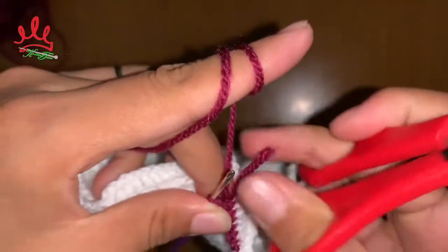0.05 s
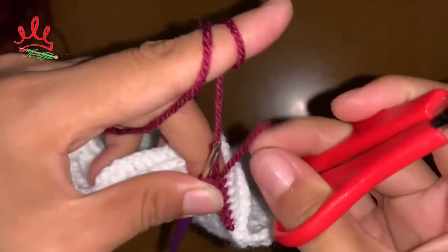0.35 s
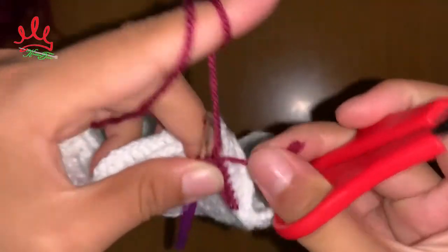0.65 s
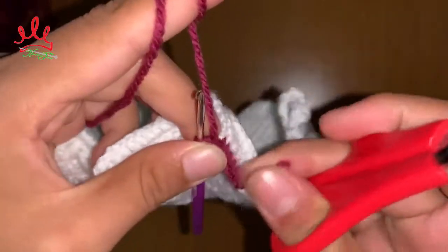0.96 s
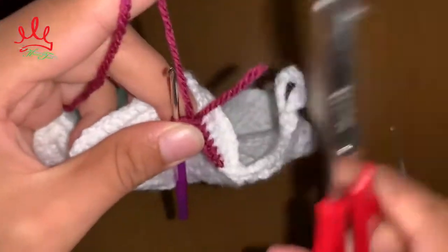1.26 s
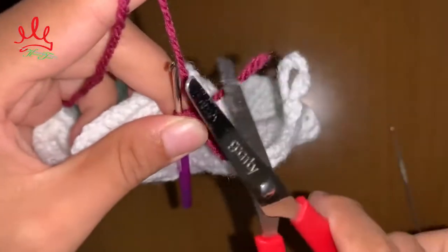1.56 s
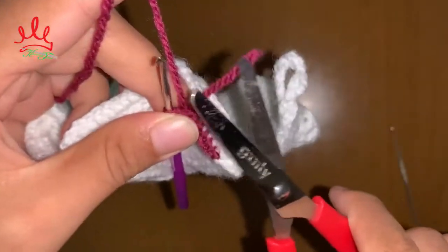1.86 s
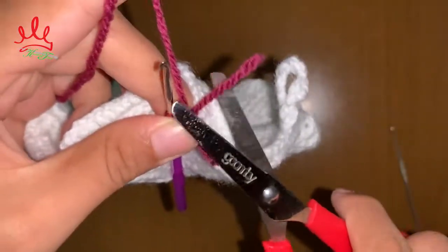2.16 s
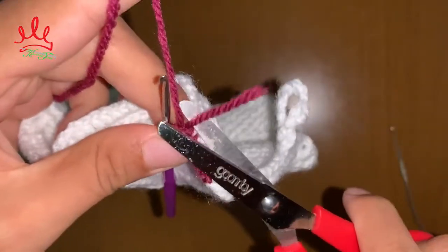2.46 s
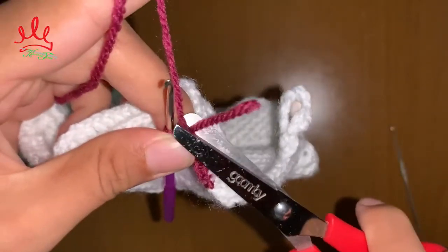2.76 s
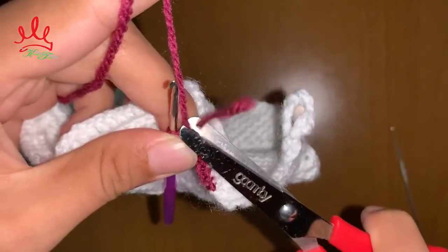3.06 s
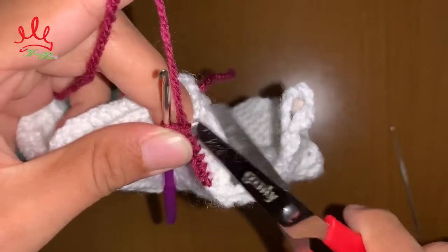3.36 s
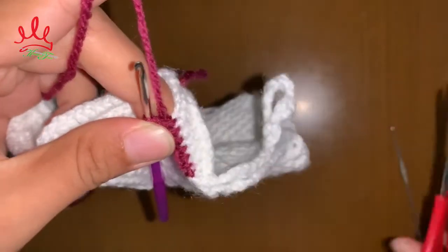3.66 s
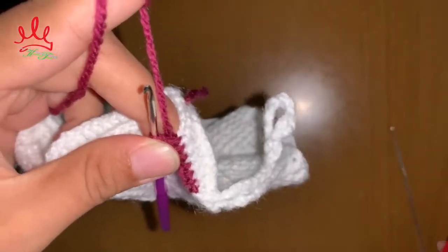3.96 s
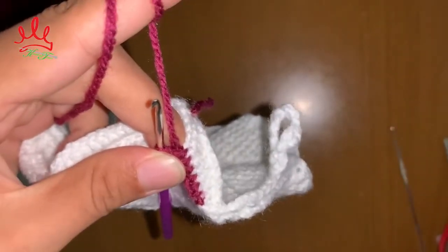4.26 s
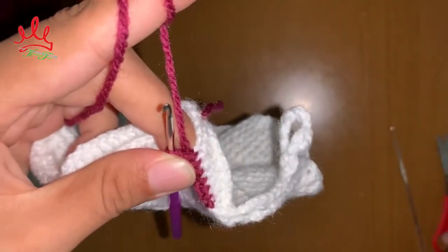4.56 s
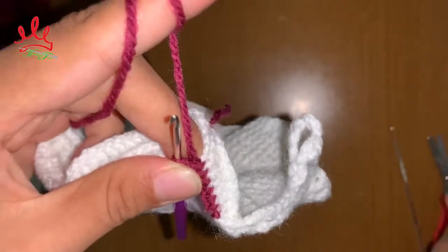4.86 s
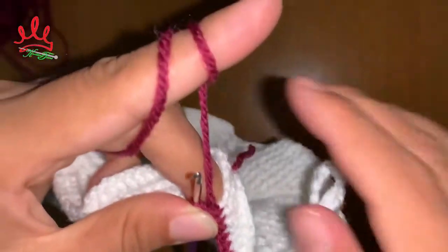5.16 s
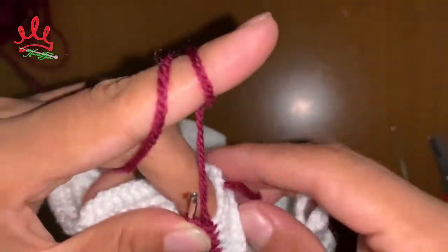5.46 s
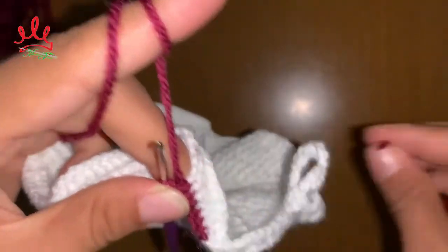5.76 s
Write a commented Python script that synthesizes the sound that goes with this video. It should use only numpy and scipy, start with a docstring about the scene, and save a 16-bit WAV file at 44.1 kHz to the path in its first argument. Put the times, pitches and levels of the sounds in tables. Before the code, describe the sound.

Scissors quietly snip yarn close by, then knock and drop onto a wooden table, their plastic handles rocking to rest.

```python
"""At a wooden table in a small room, close by, hands hold a piece of crochet and snip off the yarn end.
Wool rustles, fingers rub the scissor handles, and the steel blades tick and close in gritty bursts.
Then the scissors are put down: the tip knocks, the body drops, and the plastic handles rock to rest.
Each knock sets steel, plastic and wood ringing at their own pitches (their "modes").
The room echoes briefly, over a low hum and rumble."""
import sys
import numpy as np
from scipy import signal
from scipy.fft import rfft, irfft, next_fast_len
from scipy.io import wavfile
from scipy.ndimage import map_coordinates

SR = 44100
rng = np.random.default_rng(int(sys.argv[2]) if len(sys.argv) > 2 else 0)


def persist_wave(psi):
    """Save psi, clipped to +-1, as 16-bit WAV."""
    counts = np.round(np.clip(psi, -1, 1) * 32767).astype(np.int16)
    wavfile.write(sys.argv[1], SR, np.atleast_2d(counts).T)


N = 265526
TIME = np.arange(N) / SR
RING_TIME = np.arange(SR // 2) / SR  # seconds since a hit

# modes of the table top and of the handles: pitch_hz, level_db, fade_s (time to fall by 60 dB)
TABLE_MODES = [(183.5, -8, 0.2), (214.8, -14.5, 0.39), (222.5, 0, 0.26), (271.2, -4, 0.3),
               (304.3, -13, 0.091), (323.2, -3, 0.22), (345, -10, .2), (446, -22, 0.14), (774, -13, .11),
               (829, -11, 0.12), (921, -13.5, 0.17), (1011, -11.5, 0.14)]
HANDLE_MODES = [(804, -3, .1), (907, 0, .16), (1011, -2, .17), (1176, 3, .16), (1320, 3, .19),
                (1400, -3, .12), (1583, -2, .17), (1665, -4, .12), (1894, -2, .12), (2137, 0, .13),
                (2257, -2, .14), (2381, 1, .11), (2626, 0, .1)]
# tone colour of a thump on wood and of a plastic clack: pitch_hz, level_db
THUMP_COLOUR = [(30, -35.5), (100, -12), (160, -5.5), (215, -2.5), (310, 4.5), (400, -27.5), (560, -20.5),
                (900, -16.5), (1400, -40), (4000, -55), (9000, -110)]
CLACK_COLOUR = [(60, -38.5), (150, -29.5), (430, 3.5), (580, -13.5), (800, 0), (1300, -3.5), (1800, -2),
                (2500, -12.5), (3200, -14.5), (5000, -19.5), (8000, -41), (14000, -74.5)]


def amp(db):
    """Turn decibels into a gain."""
    return 10 ** (np.asarray(db) / 20)


def unit(x):
    """Scale a sound to an average (rms) level of 1."""
    return x / np.sqrt(np.mean(x ** 2) + 1e-20)


def along(points, hz):
    """Read between rows of (pitch_hz, value), with octaves evenly spaced."""
    pitches, values = np.transpose(points)
    return np.interp(np.log(hz + 1), np.log(pitches + 1), values)


def filtered(x, response):
    """Give each frequency in x the gain response(hz)."""
    size = x.shape[-1]
    padded = next_fast_len(size + 8192)
    return irfft(rfft(x, padded) * response(np.fft.rfftfreq(padded, 1 / SR)), padded)[..., :size]


def coloured(x, colour):
    """Shape a sound with rows of (pitch_hz, level_db)."""
    return filtered(x, lambda hz: amp(along(colour, hz)))


def noise(colour, size=N):
    """Coloured noise at level 1."""
    return unit(coloured(rng.standard_normal(size), colour))


def crackle(per_second):
    """Tiny clicks at random times and strengths."""
    return (rng.random(N) < per_second / SR) * rng.standard_normal(N)


def wobble(rate_hz):
    """A smooth curve through rate_hz random values a second."""
    return map_coordinates(rng.standard_normal(N), [TIME * rate_hz])


def strokes(rows):
    """Swells that gain 15 dB in their rise time and lose 15 dB in their fall time."""
    return sum(amp(db - 15 * np.maximum((peak_s - TIME) / rise_s, (TIME - peak_s) / fall_s))
               for peak_s, db, rise_s, fall_s in rows)


def rise(attack_s):
    """The force of a contact building up."""
    return 1 - np.exp(-(RING_TIME / attack_s) ** 2)


def burst(colour, fade_s):
    """Many crowded modes dying together, heard as a puff of noise."""
    return noise(colour, len(RING_TIME)) * amp(-60 * RING_TIME / fade_s)


def ring(modes, detune=0.0014, blur_hz=0):
    """Fading tones whose strength and pitch vary from hit to hit; rattling can blur them."""
    hz, db, fade_s = np.transpose(modes)[:, :, None]
    gain = amp(db + 2 * rng.standard_normal(db.shape))
    hz = hz * (1 + detune * rng.standard_normal(hz.shape))
    walk = np.cumsum(rng.standard_normal((len(hz), len(RING_TIME))), 1)
    phase = 2 * np.pi * hz * RING_TIME + walk * np.sqrt(2 * np.pi * blur_hz / SR)
    tones = gain * amp(-60 * RING_TIME / fade_s) * np.sin(phase)
    return np.sum(tones, 0) / np.sqrt(np.sum(gain ** 2) / 2)


def favoured(modes, pitch_hz, lift_db=8.5, width=0.05):
    """The spot that is hit brings out the modes near one pitch."""
    hz, db, fade_s = np.transpose(modes)
    return np.transpose([hz, db + lift_db / (1 + ((hz / pitch_hz - 1) / width) ** 2), fade_s])


def add(track, start_s, sound):
    """Mix a sound into a track from start_s on."""
    part = track[..., round(start_s * SR):][..., :sound.shape[-1]]
    part += sound[..., :part.shape[-1]]


def diffuse(pair):
    """Two unrelated sounds as two close microphones hear them: alike only in the bass."""
    # how alike left and right are: pitch_hz, likeness (1 = the same)
    alike = [(100, 0.89), (280, 0.6), (500, 0), (1000, -.1), (4000, 0)]
    angle = lambda hz: np.arccos(along(alike, hz)) / 2
    mid, side = filtered(pair, lambda hz: np.array([np.cos(angle(hz)), np.sin(angle(hz))]))
    return np.array([mid + side, mid - side])


def in_room(x, echo_db, build_s=0.008):
    """Sound arrives directly, bounces off hands and table, and echoes from the walls."""
    # how long the echo lasts: pitch_hz, fade_s
    echo_fade = [(100, 0.54), (300, 0.68), (1000, 0.18), (3000, 0.1942), (7000, 0.21), (10500, 0),
                 (15000, 0.09)]
    # tone colour of the echo: pitch_hz, level_db
    echo_colour = [(100, -9), (300, -13), (600, -6), (2000, 0.5), (5000, -4), (8000, -10), (11000, -9),
                   (15000, -17)]
    # how far the left microphone leads the right: pitch_hz, phase_radians
    left_lead = [(120, .01), (290, .35), (700, 1.6), (1700, 1.75), (4000, 1.5), (7300, 1.5), (13000, 1.9)]
    # how much louder the left one is: pitch_hz, level_db
    left_boost = [(600, 0), (2400, 2), (3700, 5.5), (5500, -2), (9000, -0.5)]
    size = len(RING_TIME)
    bands_hz, seconds, bands = signal.stft(rng.standard_normal((2, size)), SR, nperseg=256)
    fading = bands * amp(-60 * seconds / along(echo_fade, bands_hz)[:, None])
    echo = signal.istft(fading, SR, nperseg=256)[1][:, :size]
    echo = diffuse(coloured(echo / np.linalg.norm(echo[0]), echo_colour)) * rise(build_s)
    near = rng.standard_normal((2, size)) * amp(-60 * RING_TIME / 0.0039)
    # small things bounce back only the higher pitches
    near = filtered(near / np.linalg.norm(near[0]), lambda hz: 1j * hz / (900 + 1j * hz))
    left_over_right = lambda hz: amp(along(left_boost, hz)) * np.exp(1j * along(left_lead, hz))
    direct = filtered(x, lambda hz: left_over_right(hz) ** np.array([[0.5], [-0.5]]))
    bounced = signal.fftconvolve(x[None], amp(echo_db) * echo + amp(-6) * near, axes=1)
    return amp(-2) * direct + bounced[:, :len(x)]


def background():
    """A fluttering hum, passing low drones and uneven room rumble, with a faint steady hiss."""
    # loudness over time: time_s, hum_db, rumble_db
    low_levels = [(0, -52.5, -55), (0.5, -53, -56.5), (1.1, -49.5, -56), (1.4, -58, -55.5),
                  (2.1, -65, -57.5), (2.7, -58, -54), (2.9, -59, -54), (3.3, -49.5, -56.5),
                  (4.0, -52, -55.5), (4.5, -53.5, -55), (5.151, -68.5, -55.5), (5.45, -54.5, -58),
                  (6.0, -54, -57.5)]
    # drones that come and go: peak_s, level_db, rise_s, fall_s, pitch_hz, climb_hz_per_s
    drone_swells = [(0.328, -51.5, 0.21, 0.57, 95.33, 10.5), (1.419, -48, 0.21, 1, 54.7, 5.5),
                    (1.97, -46, 0.4, 0.091, 59.65, 2.5), (2.221, -50.5, 0.067, 0.099, 57, -15.5)]
    # tone colour of the rumble and of the hiss: pitch_hz, level_db
    rumble_colour = [(20, -30), (36, -17), (55, -3.5), (72, -4), (94, 1.5), (128, -9), (146, -5.5),
                     (172, -12.5), (205, -3.5), (228, -12.5), (275, -24.5), (420, -29.5), (900, -42.5),
                     (2500, -120)]
    hiss_colour = [(200, -13.5), (350, -9.5), (600, -4.5), (1000, -9), (2000, -15), (4000, -19),
                   (8000, -23), (10500, -26.5), (12000, -42.5), (16000, -48.5)]
    times, *levels = np.transpose(low_levels)
    hum_db, rumble_db = [np.interp(TIME, times, level) for level in levels]
    hum_hz = 50.3
    hum_gain = amp(hum_db + 3.5 * wobble(rate_hz=7.3))
    hum = hum_gain * np.sin(2 * np.pi * hum_hz * TIME + 0.66 * wobble(rate_hz=4.2))
    drones = np.zeros(N)
    for peak_s, db, rise_s, fall_s, hz, climb in drone_swells:
        phase = 2 * np.pi * np.cumsum(hz + climb * (TIME - peak_s)) / SR + 0.37 * wobble(rate_hz=12)
        tone = unit(np.sin(phase) + amp(-15) * np.sin(2 * phase))
        drones += strokes([(peak_s, db, rise_s, fall_s)]) * tone
    rumble = amp(rumble_db + 0.8 * wobble(rate_hz=14)) * unit(diffuse(noise(rumble_colour, (2, N))))
    drones *= amp(1.8 * wobble(rate_hz=15))
    hiss = amp(-75.5) * unit(diffuse(noise(hiss_colour, (2, N))))
    return hum + drones + rumble + hiss


def wool_rustle():
    """Swells of wool hiss, as yarn slides through the fingers or is squeezed between the blades."""
    # swells of hiss: peak_s, level_db, rise_s, fall_s
    swells = [(0.065, -75, 0.08, 0.081), (0.24, -79.5, 0.098, 0.25), (0.64, -84, 0.053, 0.03),
              (0.80, -69.5, 0.13, .12), (1.10, -64.5, 0.059, 0.031), (1.2, -71.5, 0.081, 0.084),
              (1.312, -65, 0.02, 0.0082), (1.42, -80, 0.19, 0.14), (2.01, -78.5, 0.085, 0.3),
              (2.35, -63.5, 0.032, 0.035), (2.475, -75, 0.013, 0.039), (2.638, -73, 0.092, 0.023),
              (3.0, -81.5, 0.45, 0.45), (3.172, -53, 0.0085, 0.02), (3.215, -53, 0.014, 0.0095),
              (3.42, -68.5, 0.021, 0.031), (3.73, -75, 0.16, 0.13), (5.27, -73, 0.077, 0.12),
              (5.435, -70, 0.027, 0.081), (5.635, -58.5, 0.088, 0.067), (5.79, -74.5, 0.027, 0.15)]
    # tone colour of fibres sliding and of single fibres catching: pitch_hz, level_db
    slide_colour = [(300, -19), (800, -9.5), (2000, -7), (3700, -3.5), (4800, -8), (6700, -1), (8500, -6),
                    (10200, -1.5), (11400, -6), (12600, -5), (13500, -18), (15500, -44.5)]
    catch_colour = [(300, -14), (1500, -29), (3500, -14), (4800, 1), (7000, -5), (11200, 13.5),
                    (13000, 3.5), (15500, -59)]
    movement = strokes(swells) * amp(1.7 * wobble(rate_hz=120))  # uneven as the strands pass
    catches = unit(coloured(crackle(per_second=250), catch_colour))
    return in_room(movement * (noise(slide_colour) + 0.5 * catches), echo_db=-2.5)


def finger_rubs():
    """Skin sticks and slips on the hollow handles: a crisp, grainy scratch."""
    # finger movements: peak_s, level_db, rise_s, fall_s
    rubs = [(0.07, -74, 0.048, 0.069), (0.80, -67, 0.035, 0.017), (0.835, -64.5, 0.029, 0.036),
            (1.10, -69, 0.07, 0.03), (1.23, -66, 0.034, 0.031), (1.335, -71, 0.024, 0.027),
            (1.434, -67.5, 0.056, 0.045), (5.431, -65.5, 0.014, 0.012), (5.58, -65, 0.057, 0.066)]
    # the handles answer most near one pitch: pitch_hz, level_db
    hollow = [(300, -4), (1300, -6), (2200, -1), (2700, -4), (3500, 8), (4500, -6), (7000, -10),
              (13000, -22)]
    scratch = unit(coloured(crackle(per_second=330), hollow))
    return in_room(strokes(rubs) * scratch, echo_db=0)


def light_ticks():
    """Small ticks with one brief ring, from the hook, handles or closing blades."""
    # ticks: start_s, level_db, pitch_hz
    ticks = [(0.485, -59, 5820), (0.769, -52, 3500), (0.778, -51.5, 3600), (0.788, -50, 3370),
             (0.914, -53, 1930), (1.309, -49.5, 1300), (1.311, -53, 3430), (2.640, -62, 1570),
             (3.173, -48, 3520), (5.948, -37.5, 6350)]
    out = np.zeros((2, N))
    for start_s, db, hz in ticks:
        click = burst([(hz / 2, -18), (hz, 0), (hz * 1.4, -15), (15000, -24)], fade_s=0.0033)
        fade_s = (14 + hz / 130) / hz
        tone = np.sin(2 * np.pi * hz * RING_TIME) * amp(-60 * RING_TIME / fade_s)
        tick = amp(db) * (tone + 0.52 * click) * rise(attack_s=0.00019)
        add(out, start_s, in_room(tick, echo_db=-8))
    return out


def snips():
    """Blades and fibres catch and let go in gritty bursts; the edges squeak as they cut the yarn."""
    # blades closing and fibres snapping: start_s, level_db, pitch_hz, length_s
    snaps = [(0.64, -51, 10400, 0.0037), (0.767, -46, 11100, 0.004), (0.776, -46, 11100, 0.005),
             (0.787, -47, 11500, .003), (0.912, -64, 13900, .008), (1.308, -49.5, 13300, .008),
             (2.2965, -46, 7400, .006), (2.342, -43, 9260, .008), (2.352, -43, 12400, .008),
             (2.361, -43.5, 12500, 0.0078), (2.392, -49, 9700, .003), (3.166, -47, 6900, .008),
             (3.1715, -38.5, 6960, 0.0053), (3.175, -36.5, 7100, 0.0071), (3.205, -45, 9800, 0.0077),
             (3.2105, -37, 6960, .008), (3.44, -48, 9900, 0.0045)]
    # squeaks of the edges: start_s, level_db
    squeaks = [(3.1702, -28), (3.207, -38)]
    # tone colour of a snap and of a squeak: pitch_hz, level_db
    snap_colour = [(300, -10), (1400, -19), (2050, -8), (2700, -23), (3900, -6.5), (4900, -14),
                   (6100, -4), (8500, -8), (10200, 3), (11400, -18), (12400, -14), (13600, -25),
                   (16000, -57)]
    squeak_colour = [(11000, -38), (13300, -12), (14600, 1), (15300, -18), (16000, -40)]
    out = np.zeros((2, N))
    size = len(RING_TIME)

    def let_go(start_s, sound, length_s):
        short = sound * np.exp(-2 * RING_TIME / length_s) * rise(attack_s=0.19 * length_s)
        add(out, start_s, in_room(short, echo_db=-12))

    for start_s, db, pitch_hz, length_s in snaps:
        grit = rng.standard_normal(size) * amp(rng.standard_normal(size))
        edge = lambda hz: amp(along(snap_colour, hz)) + 1.05 * np.exp(-((hz - pitch_hz) / 600) ** 2)
        let_go(start_s, amp(db) * unit(filtered(grit, edge)), length_s)
    for start_s, db in squeaks:
        let_go(start_s, amp(db) * noise(squeak_colour, size), length_s=0.01)
    return out


def grip_bumps():
    """The hands shift their grip with a soft, low bump."""
    # changes of grip: peak_s, level_db, rise_s, fall_s
    shifts = [(0.81, -56.5, 0.083, 0.12), (1.445, -52.5, 0.025, 0.034)]
    # tone colour of a bump: pitch_hz, level_db
    bump_colour = [(30, -6), (80, -5), (200, -10), (330, -18), (700, -36), (2000, -68)]
    return strokes(shifts) * unit(diffuse(noise(bump_colour, (2, N))))


def steel_click(tip, soft):
    """Steel hits wood with a sharp click, duller in a soft landing."""
    # tone colour when landing on the tip and when landing flat: pitch_hz, level_db
    tip_colour = [(300, -24), (1300, -21), (2100, -11), (3700, -16), (4700, -2), (5500, -10.5), (6150, 4.5),
                  (6700, -7), (7300, -12.5), (7800, -18), (9100, -1), (10000, -10), (10850, 6.5),
                  (12000, -15.5), (13700, -5.5), (16500, -29.5)]
    flat_colour = [(300, -28.5), (1000, -25.5), (2450, 2), (3200, -8.5), (4500, -9.5), (5600, -8),
                   (6400, -7.5), (7000, -6), (7570, 5.5), (8500, -16.5), (9700, 7), (11000, 2.5),
                   (12200, -6), (13200, -11), (14300, -2), (15500, -11), (16500, -19.5)]
    on_tip = np.sqrt(tip) * burst(tip_colour, fade_s=0.013)
    on_flat = np.sqrt(1 - tip) * burst(flat_colour, fade_s=0.014)
    click = (on_tip + on_flat) * rise(attack_s=0.0028)
    return filtered(click, lambda hz: 1 / (1 + 1j * soft * hz / 6000) ** 3)


def handle_clack(soft, pitch_hz):
    """The handles clack, more slowly and dully when the plastic itself rolls onto the wood."""
    clack = burst(CLACK_COLOUR, fade_s=0.059)
    clack += amp(-7.5 - 1.5 * soft) * ring(favoured(HANDLE_MODES, pitch_hz))
    dull = lambda hz: 1 / (1 + 1.4j * soft * hz / 1800 - (soft * hz / 1800) ** 2)
    return filtered(clack * rise(attack_s=0.002 + 0.0045 * soft), dull) * amp(0.75 * soft)


def table_thump(tip, soft, pitch_hz):
    """The table top thumps and rings, starting faster when the tip hits it."""
    wood = ring(favoured(TABLE_MODES, pitch_hz), detune=0.0055)
    wood += amp(2.5) * burst(THUMP_COLOUR, fade_s=0.099)
    return wood * rise(attack_s=0.0111 * (1 - tip) + 0.0054 * tip) * amp(-5 * soft)


def frame_boom():
    """The whole table bounces on its legs; being heavy, it is slow to get going."""
    # modes of the frame: pitch_hz, level_db, fade_s
    frame_modes = [(62, -10, .2), (77, -2, .34), (100, -9, 0.2), (122, 0, .2)]
    return ring(frame_modes) * rise(attack_s=0.008)


def blade_ring(tip, pitch_hz):
    """The two blades ring and rattle against each other, over a short wash of crowded modes."""
    # modes of the steel: pitch_hz, tip_hit_db, flat_hit_db, fade_s
    blade_modes = [(2140, -5, -7, .11), (2205, -7, -14, .22), (2640, -20, 1, .09), (2850, 1, -8, .1),
                   (2998, -12, -8, .13), (3365, -7, -9, .18), (3560, -4, -9, .2), (3741, -8, -8, .16),
                   (4090, -12, -4, .14), (4404, -14, -7, .14), (4560, -5, -10, .22), (4690, 0, -9, .16),
                   (4950, 0, -9, .15), (5120, -6, -8, .15), (5500, -14, -6, .1), (5800, -5, -6, .14),
                   (6130, 0, -8, .13), (6570, -7, -8, .12), (6907, -10, -3, .09), (7568, -11, 4, .09),
                   (9400, -5, -6, .08), (10150, -7, -3, .1), (10830, -4, -6, .08), (12950, -15, -11, .08)]
    # tone colour of the crowded bending modes: pitch_hz, level_db
    wash_colour = [(500, -45), (2000, -7), (2800, -1), (4000, -3.5), (5500, -8.5), (7000, -12),
                   (11000, -18.5), (15000, -42.5)]
    hz, tip_db, flat_db, fade_s = np.transpose(blade_modes)
    modes = np.transpose([hz, tip * tip_db + (1 - tip) * flat_db, fade_s])
    steel = ring(favoured(modes, pitch_hz), detune=0.005, blur_hz=26)
    return (steel + amp(-2) * burst(wash_colour, fade_s=0.06)) * rise(attack_s=0.00033)


def knocks():
    """The scissors land on the table: every contact shakes the steel, the handles and the wood."""
    # contacts: start_s, click_db, ring_db, thump_db, boom_db, clack_db,
    # tip (0 = lands flat, 1 = on the tip), scissors_pitch_hz, table_pitch_hz
    contacts = [(4.13, -56, -59, -42.5, -70.5, -49, 1, 4960, 820),
                (4.139, -4, -41, -19, -34.5, -40, 1, 4760, 177),
                (4.1548, -10.5, -36, -24, -30.5, -52.5, 0.8, 5130, 283),
                (4.276, -48, -59.5, -59.5, -69.5, -64.5, 0.79, 4720, 180),
                (4.2901, -16, -38.5, -33, -45.5, -43, 0.75, 2850, 299),
                (4.305, -56, -43.5, -31.5, -54.5, -50, 0.61, 4260, 270),
                (4.4542, -71, -63, -50.5, -60.5, -67, 0.53, 4700, 220),
                (4.645, -33, -49.5, -23.5, -43.5, -22.5, 0.2, 1310, 820),
                (4.6546, -10, -28.5, -23, -19, -17.5, 0.07, 1176, 325),
                (4.6592, 8.5, -28.5, -20.5, -47, -18, 0.034, 5500, 271),
                (4.680, -26.5, -42, -27.5, -51, -29.5, .2, 2380, 315),
                (4.6939, -13.5, -33, -19, -34.5, -18.5, 0.27, 2210, 222),
                (4.701, -22, -29, -26, -33, -17, .2, 3740, 222),
                (4.732, -44.5, -53, -32.5, -40, -51, .1, 2998, 270),
                (4.821, -69.5, -70, -38, -65, -36, 0.09, 2140, 295),
                (4.8505, -53.5, -53.5, -24, -57, -22.5, 0.12, 1670, 270),
                (4.872, -59, -54.5, -18.5, -52, -19.5, 0.15, 904, 279),
                (4.886, -65, -63, -21, -59, -24.5, .1, 1170, 318),
                (4.935, -59, -62, -27, -57, -26, .1, 1324, 222),
                (4.948, -60, -68, -28.5, -56, -29, 0.1, 1320, 293.5),
                (4.961, -55.5, -74, -29, -61, -29, .1, 1176, 272.6),
                (4.980, -68, -79, -26, -51, -36.5, .1, 1570, 318)]
    out = np.zeros((2, N))
    for start_s, click_db, ring_db, thump_db, boom_db, clack_db, tip, scissors_hz, table_hz in contacts:
        soft = 1 / (1 + amp(click_db - clack_db + 16.5))  # near 0 when steel lands, near 1 for plastic
        knock = (amp(click_db) * steel_click(tip, soft)
                 + amp(clack_db) * handle_clack(soft, scissors_hz)
                 + amp(thump_db) * table_thump(tip, soft, table_hz)
                 + amp(boom_db) * frame_boom()
                 + amp(ring_db) * blade_ring(tip, scissors_hz))
        add(out, start_s, in_room(knock, echo_db=-3, build_s=0.0023))
    return out


def tip_drag():
    """Between knocks the tip slides a little, and the table top murmurs under it."""
    # slides on the wood: peak_s, level_db, rise_s, fall_s
    slides = [(4.48, -51, .04, .1), (4.64, -36.5, 0.097, .03)]
    # tone colour of the scrape: pitch_hz, level_db
    scrape_colour = [(60, -25.5), (180, 0), (250, 0), (320, 3.5), (380, -24.5), (700, -34.5), (2000, -44),
                     (4500, -52), (10000, -52), (14000, -88.5)]
    return in_room(strokes(slides) * noise(scrape_colour), echo_db=1)


def handles_rocking():
    """The handles rock to rest: many tiny contacts, each a small ringing clack and a small thump."""
    # swings of the handles: peak_s, level_db, rise_s, fall_s
    swings = [(4.895, -36.5, 0.039, 0.016), (4.972, -41, 0.049, 0.026), (5.018, -43.5, 0.026, 0.02)]
    contacts = unit(crackle(per_second=1200)) * strokes(swings)
    plastic = burst(CLACK_COLOUR, fade_s=0.017) + amp(-8) * ring(HANDLE_MODES)
    clack = filtered(plastic * rise(attack_s=0.00068), lambda hz: 1 / (1 + 1j * hz / 2100) ** 3)
    thump = ring(favoured(TABLE_MODES, pitch_hz=292)) + burst(THUMP_COLOUR, fade_s=0.21)
    one_contact = clack / np.linalg.norm(clack) + amp(4.5) * thump / np.linalg.norm(thump)
    return in_room(signal.fftconvolve(contacts, one_contact)[:N], echo_db=-5.5)


def scene():
    """Mix the hands with the table and background, which sit slightly to the left."""
    table = knocks() + handles_rocking() + tip_drag()
    hands = snips() + grip_bumps() + light_ticks() + finger_rubs() + wool_rustle()
    return (table + background()) * amp([[0.3], [-0.3]]) + hands


def record(dry):
    """The microphone drops the deepest bass; the loudest peaks are softly rounded off, and the recorder cuts
    the top treble."""
    bass_hz, ceiling_db, top_hz = 38, -1.5, 16000
    thinned = signal.sosfilt(signal.butter(4, bass_hz, "high", fs=SR, output="sos"), dry)
    rounded = thinned / (1 + (thinned / amp(ceiling_db)) ** 6) ** (1 / 6)
    return filtered(rounded, lambda hz: 1 / np.sqrt(1 + (hz / top_hz) ** 160))


dry = scene()
out = record(dry)
persist_wave(out)
```